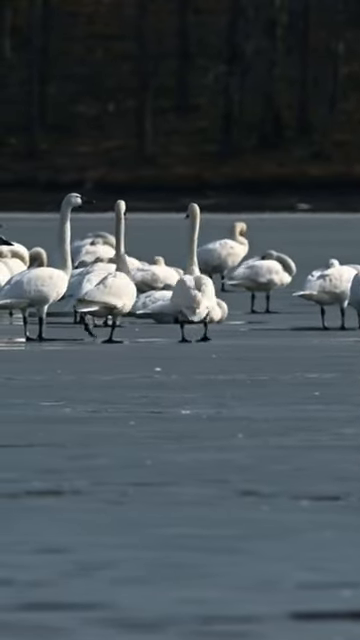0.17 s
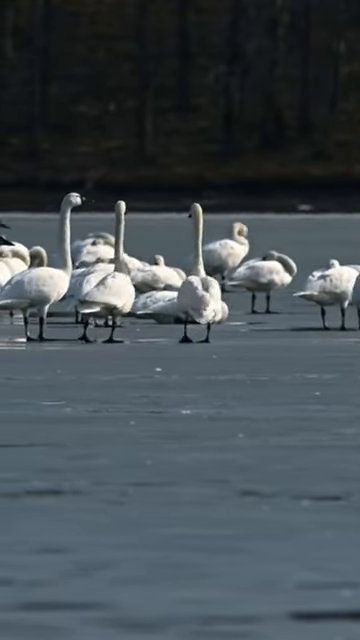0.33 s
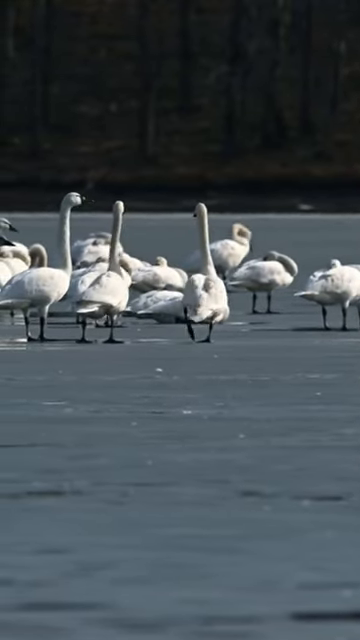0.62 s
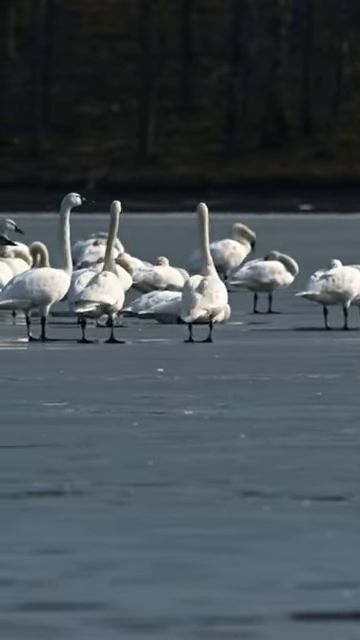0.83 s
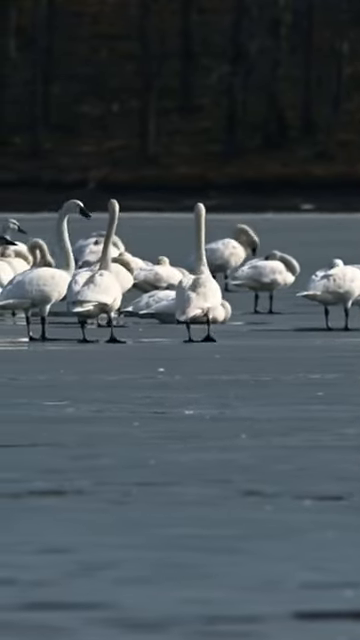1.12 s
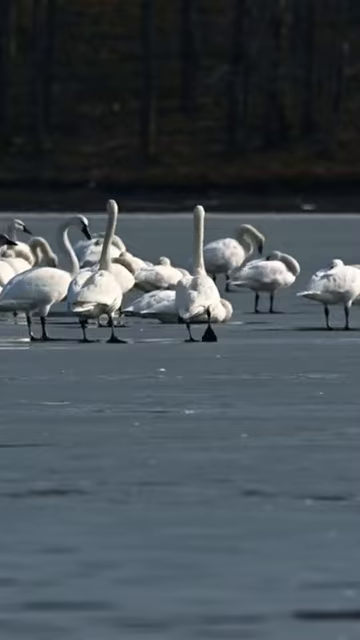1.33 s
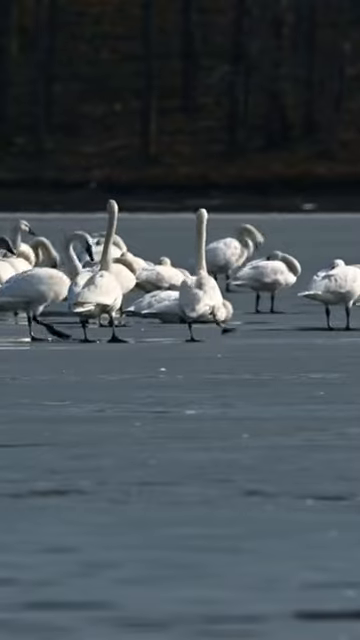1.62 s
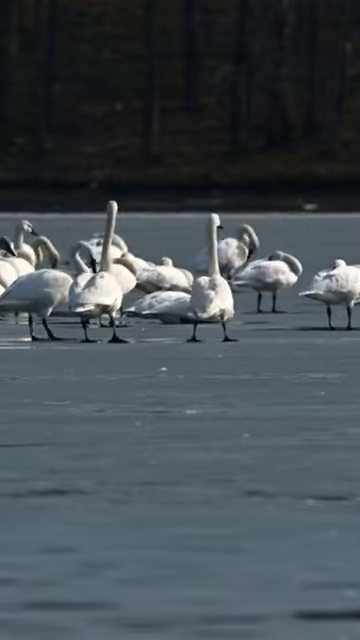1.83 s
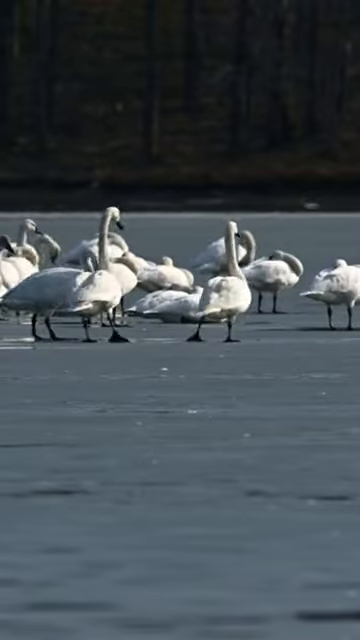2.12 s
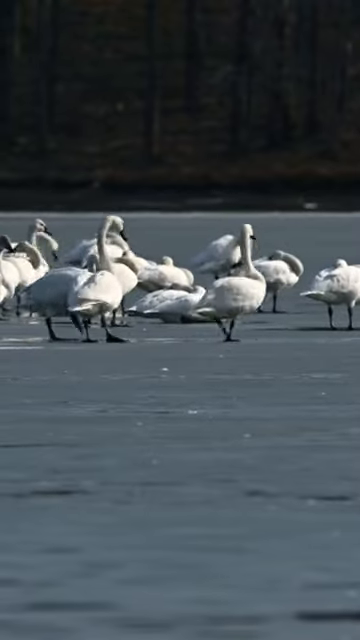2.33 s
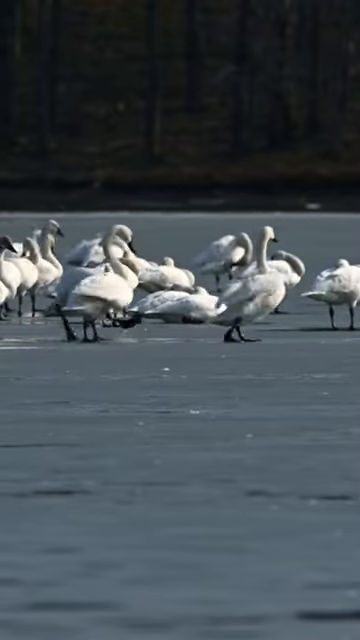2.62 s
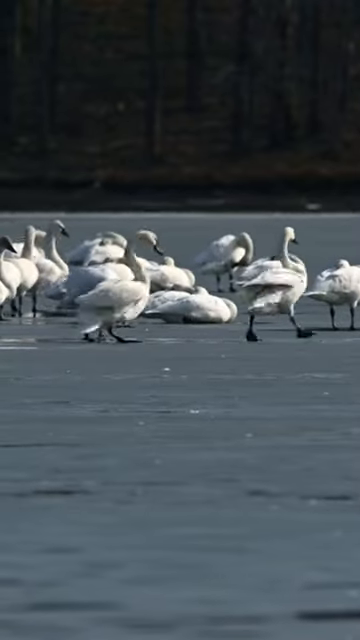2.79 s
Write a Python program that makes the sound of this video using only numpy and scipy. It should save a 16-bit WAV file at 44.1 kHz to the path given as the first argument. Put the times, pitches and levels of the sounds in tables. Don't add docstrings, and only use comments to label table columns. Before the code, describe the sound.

Steady wind rumble and hiss on a lakeshore, swans hooting briefly and faintly over ice

```python
import sys
import numpy as np
from scipy import signal
from scipy.fft import rfft, irfft
from scipy.io import wavfile
from scipy.ndimage import uniform_filter1d, map_coordinates

SR = 44100
rng = np.random.default_rng(int(sys.argv[2]) if len(sys.argv) > 2 else 0)


def pcm_store(signal):
    levels = np.round(np.clip(np.atleast_2d(signal), -1, 1) * 32767)
    wavfile.write(sys.argv[1], SR, levels.astype(np.int16).T)


def volts(x):
    e = np.asarray(x, float) / 20
    return 10 ** e


N = 130536


def unit(x):
    return x / np.sqrt(np.mean(x ** 2) + 1e-20)


def curves(rows, t):
    s, *cols = np.transpose(rows)
    return [np.interp(t, s, c) for c in cols]


def wobble(rate, size=N):
    knots = rng.standard_normal(int(size / SR * 400) + 4)
    return map_coordinates(knots, [np.arange(size) * min(rate, 400) / SR])


def rush(spectrum, patchy_db):
    z = signal.stft(rng.standard_normal(N + 4096), nperseg=1024)[2]
    field = uniform_filter1d(rng.standard_normal(z.shape), size=5, axis=0)
    field = uniform_filter1d(field, size=5, axis=1)
    x = signal.istft(z * volts(patchy_db * unit(field)), nperseg=1024)[1]
    f, db = np.transpose(spectrum)
    hz = np.fft.rfftfreq(len(x), 1 / SR)
    colour = volts(np.interp(np.log(hz + 1), np.log(f + 1), db))
    return unit(irfft(rfft(x) * colour, len(x))[:N])


def wind():
    # t/s, level/dB
    gusts = [(0.0, -20), (0.53, -22.5), (0.95, -22.5), (1.31, -24.5), (1.5, -22.5), (1.89, -24.5),
             (2.48, -24), (2.96, -22)]
    # t/s, level/dB
    tree_gusts = [(0.0, -36.5), (0.15, -41), (0.8, -40), (1.16, -41.5), (1.83, -41.5), (2.25, -40.5),
                  (2.63, -41.5), (2.96, -42)]
    # f/Hz, level/dB (per Hz)
    rumble_colour = [(8.8, -45), (15, -14), (81, -0.5), (156, -4), (273, -14.5), (301, -21), (381, -25),
                     (420, -54), (550, -31), (920, -120)]
    roar_colour = [(200, -14.5), (320, 0.5), (500, -4.5), (850, -11), (1000, -19.5), (1200, -37.5),
                   (1500, -88)]
    rustle_colour = [(1200, -8), (2100, -15.5), (2900, 10), (3800, 0), (6500, -14), (9000, -46)]
    t = np.arange(N) / SR
    low_db, = curves(gusts, t)
    trees_db, = curves(tree_gusts, t)
    low_db = low_db + 1 * wobble(3.26) + 0.03 * wobble(10.78)
    rumble = volts(low_db) * rush(rumble_colour, patchy_db=0.12)
    roar = volts(trees_db + 0.18 * wobble(8.2)) * rush(roar_colour, patchy_db=0.57)
    swing_db = 2 * (trees_db - trees_db.mean())
    rustle = volts(-69 + swing_db + 1.2 * wobble(13)) * rush(rustle_colour, patchy_db=1.5)
    return rumble + roar + rustle


def microphone_hiss():
    # f/Hz, level/dB (per Hz)
    hiss_colour = [(300, -4.5), (1300, -2.5), (2500, -0.5), (6000, -2), (15600, -2.5)]
    flutter_db = 0.4 * (wobble(6.75) + wobble(22))
    return volts(-52.5 + flutter_db) * rush(hiss_colour, patchy_db=1.4)


def add(out, s, x):
    part = out[round(s * SR):][:len(x)]
    part += x[:len(part)]


def voice(hz, level_db, harmonics_db, rough=1):
    size = len(hz)
    jitter = rough * 0.004 * wobble(89, size)
    phase = 2 * np.pi * np.cumsum(hz * (1 + jitter)) / SR
    out = np.zeros(size)
    for k, db in enumerate(harmonics_db, 1):
        shimmer_db = np.sqrt(rough) * 1.1 * wobble(74, size)
        out += volts(level_db + db + shimmer_db) * np.sin(k * phase)
    return np.sqrt(2) * out


def gate(t, length):
    return np.sin(np.pi / 2 * np.clip(np.minimum(t, length - t) / 0.013, 0, 1)) ** 2


def drooping_calls(rows, harmonics_db, sharp=0, rough=1):
    out = np.zeros(N)
    for s, length, start_hz, droop, db in rows:
        t = np.arange(round(length * SR)) / SR
        hz = start_hz * (1 + sharp * np.exp(-t / 0.006)) - droop * t
        add(out, s, gate(t, length) * voice(hz, db, harmonics_db, rough))
    return out


def hoots():
    # t/s, length/s, f/Hz, droop/(Hz per s), level/dB
    hoot_calls = [
        (.294, .066, 568, 250, -31.5),
        (.391, .049, 548, 60, -35),
        (.588, .066, 548, 250, -36.5),
        (.02, .14, 385, 30, -41.5),
        (.33, .11, 400, 100, -43),
    ]
    hoot_harmonics = [0, -42, -38, -40, -38]
    return drooping_calls(hoot_calls, hoot_harmonics, sharp=0.2)


def ice():
    # t/s, level/dB, f/Hz (centre), t60/s
    ticks = [(.303, -50, 2000, .04), (.373, -46, 3000, .04), (.368, -50, 5500, .03), (.474, -51, 5500, .02),
             (.533, -49, 2700, .025), (.696, -52, 5000, .02), (.857, -50, 6200, .04),
             (.894, -46, 5400, .025), (.91, -47, 2700, .05), (.91, -49.5, 2000, .05), (.928, -46, 850, .1),
             (.932, -51, 2700, .03), (1.312, -53, 2800, .04), (1.367, -50, 5500, .02),
             (1.48, -52, 3300, .04), (1.53, -52, 6000, .02), (1.763, -50, 6500, .02),
             (1.763, -49, 9000, .02), (1.922, -48, 2700, .025), (2.126, -52, 5000, .02),
             (2.288, -49, 8500, .02), (2.29, -50, 3300, .03), (2.537, -50, 4800, .03),
             (2.625, -51, 2800, .03), (2.625, -51, 8500, .02), (2.663, -46.5, 8800, .025),
             (2.821, -48, 5600, .025), (2.92, -45, 2900, .025), (2.921, -52, 2050, .03),
             (2.928, -49, 2750, .03), (2.925, -54, 4500, .04)]
    spread = 1.14
    out = np.zeros(N)
    t = np.arange(SR // 10) / SR
    for s, db, hz, t60 in ticks:
        band = signal.butter(3, [hz / spread, hz * spread], "band", fs=SR, output="sos")
        envelope = volts(-60 * t / t60) * (1 - np.exp(-t / 0.0021))
        burst = signal.sosfilt(band, envelope * rng.standard_normal(len(t)))
        add(out, s, volts(db) * np.sqrt(SR * t60 / 30) * burst / np.linalg.norm(burst))
    return out


def distant_note():
    # t/s, length/s, f/Hz, droop/(Hz per s), level/dB
    far_calls = [
        (.685, .06, 860, 10, -52),
        (.742, 0.069, 855, 10, -46),
        (.855, 0.051, 854, 10, -49.5),
        (.935, 0.056, 863, 10, -48),
        (1.97, 0.057, 930, 10, -51.5),
    ]
    return drooping_calls(far_calls, [0], rough=2.5)


def cracked_hoot():
    # t/s, length/s, f/Hz, droop/(Hz per s), level/dB
    scraps = [
        (.903, .022, 650, 2500, -31.5),
        (.907, .022, 800, 1000, -43),
        (.915, .028, 500, -900, -29),
        (.933, .027, 510, 2500, -29.5),
        (.928, .032, 1020, 3000, -47),
    ]
    scrap_harmonics = [0, -34, -38, -38, -36]
    return drooping_calls(scraps, scrap_harmonics, rough=5)


def faint_calls():
    # t/s, length/s, f/Hz, droop/(Hz per s), level/dB
    thin_calls = [
        (1.325, .05, 1185, -1100, -64.5),
        (1.37, .035, 1185, 1500, -65),
    ]
    thin_harmonics = [-5, 0]
    return drooping_calls(thin_calls, thin_harmonics, rough=4)


def whoops():
    arches = [
        (1.418, 762, -55, .046, .058),
        (1.929, 760, -53, .042, .068),
        (2.696, 745, -50, .04, .054),
    ]
    whoop_harmonics = [-3, 0, -11, -21]
    out = np.zeros(N)
    for top_s, top_hz, db, before, after in arches:
        t = np.arange(round((before + after) * SR)) / SR
        early = np.maximum(before - t, 0)
        late = np.maximum(t - before, 0)
        hz = top_hz * (1 - 0.112 * ((early / 0.029) ** 2.3 + (late / 0.038) ** 1.8))
        pipe_db = -10 * np.log10(1 + (2 * (2 * hz - 1415) / 200) ** 2)
        upper_db = -10 * np.log10(1 + (2 * (3 * hz - 2170) / 200) ** 2)
        gains_db = (pipe_db, pipe_db, upper_db, pipe_db)
        harmonics_db = [own + gain for own, gain in zip(whoop_harmonics, gains_db)]
        add(out, top_s - before, gate(t, before + after) * voice(hz, db, harmonics_db))
    return out


def bright_call():
    # t/s, f/Hz, effort level/dB, beak opening as overtone gain/dB
    bright_path = [
        (2.272, 600, -49, -26),
        (2.291, 712, -43.5, -3),
        (2.312, 760, -48, -11),
        (2.329, 795, -48, 1),
        (2.358, 846, -54, 0),
        (2.382, 824, -50, -7),
        (2.4, 762, -41, -9),
        (2.42, 703, -39, -10),
        (2.443, 600, -56, -20),
    ]
    # f/Hz, width/Hz, level/dB
    throat = [(1580, 500, -64), (2190, 150, -58), (2500, 260, -51.5), (3180, 740, -51.5), (3640, 120, -57)]

    def throat_db(f):
        return 10 * np.log10(sum(volts(2 * db) / (1 + (2 * (f - c) / w) ** 2) ** 2 for c, w, db in throat))

    t = np.arange(bright_path[0][0], bright_path[-1][0], 1 / SR)
    hz, effort_db, beak_db = curves(bright_path, t)
    overtones_db = [beak_db + throat_db(k * hz) for k in range(2, 6)]
    out = np.zeros(N)
    add(out, t[0], voice(hz, 0, [effort_db] + overtones_db))
    return out


def shore(x):
    t = np.arange(SR // 2) / SR
    delay, t60 = 0.05, 0.2
    tail = rng.standard_normal(len(t)) * volts(-60 * (t - delay) / t60) * (t > delay)
    return signal.fftconvolve(x, tail / np.linalg.norm(tail))[:N]


def scene():
    birds = hoots() + ice() + distant_note() + cracked_hoot() + faint_calls() + whoops() + bright_call()
    return (birds + volts(-18) * shore(birds) + wind())[None]


def roll_off(x):
    return signal.sosfilt(signal.butter(12, 15640, fs=SR, output="sos"), x)


def record(dry):
    n = np.arange(N)
    to_edge_s = np.minimum(n, n[::-1]) / SR
    stop = np.sin(np.pi / 2 * np.clip(to_edge_s / 0.0005, 0, 1)) ** 2
    return roll_off((dry + 0.0033) * stop + microphone_hiss())


dry = scene()
out = record(dry)
pcm_store(out)
```